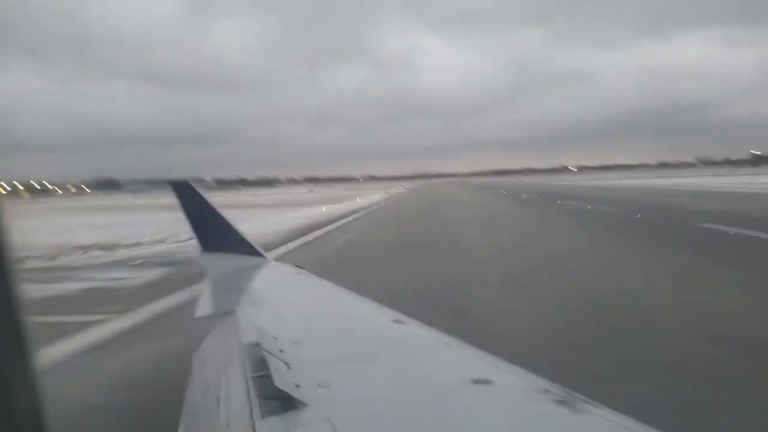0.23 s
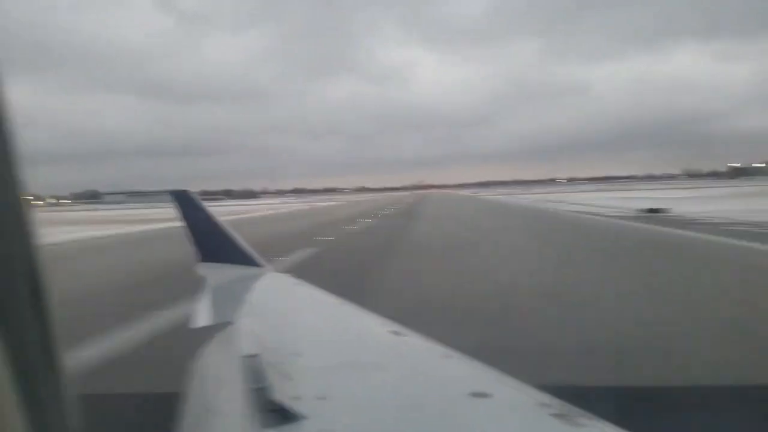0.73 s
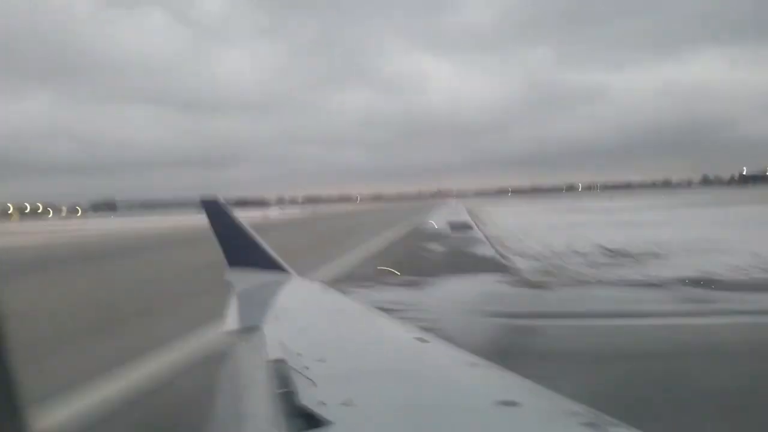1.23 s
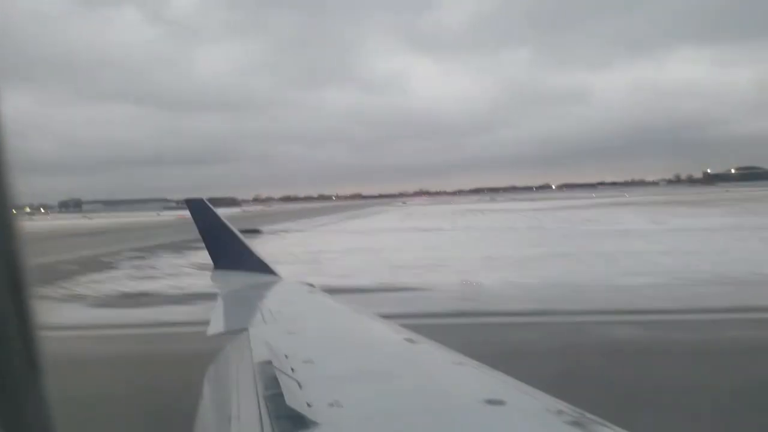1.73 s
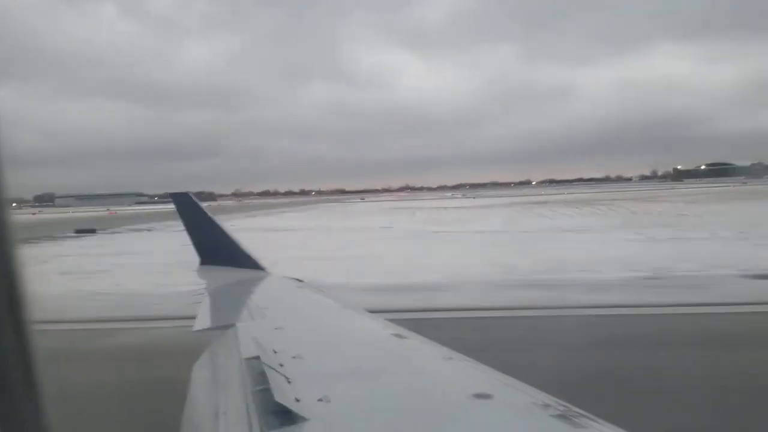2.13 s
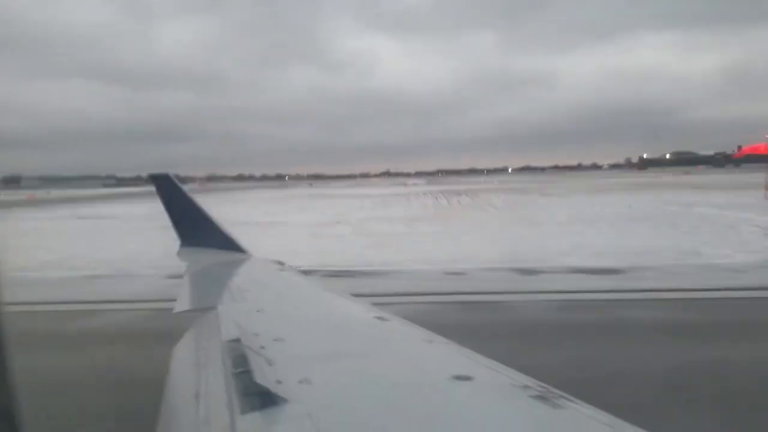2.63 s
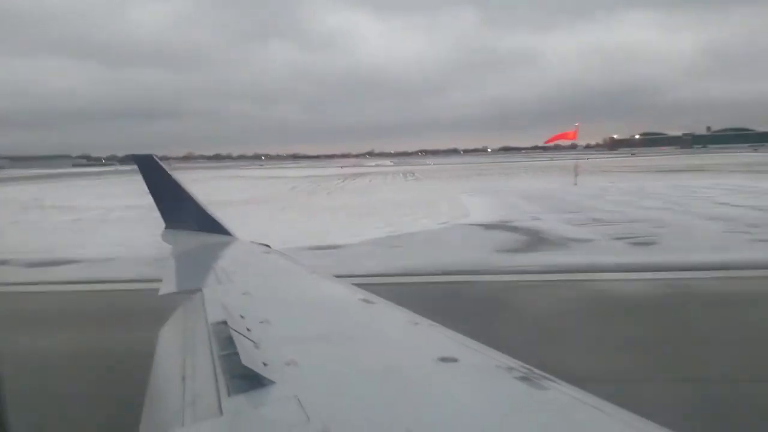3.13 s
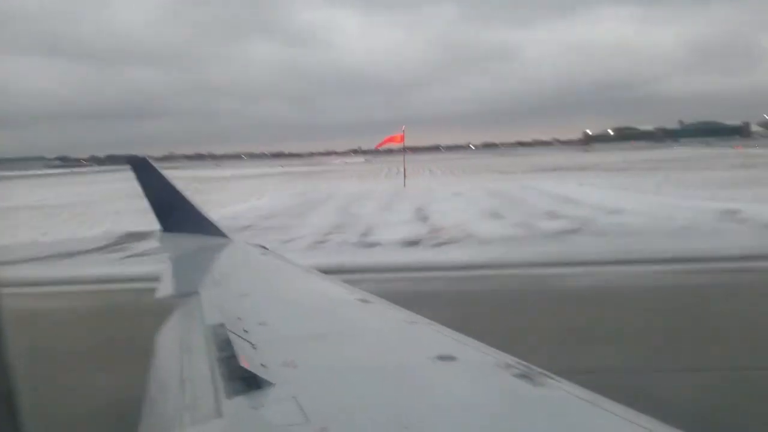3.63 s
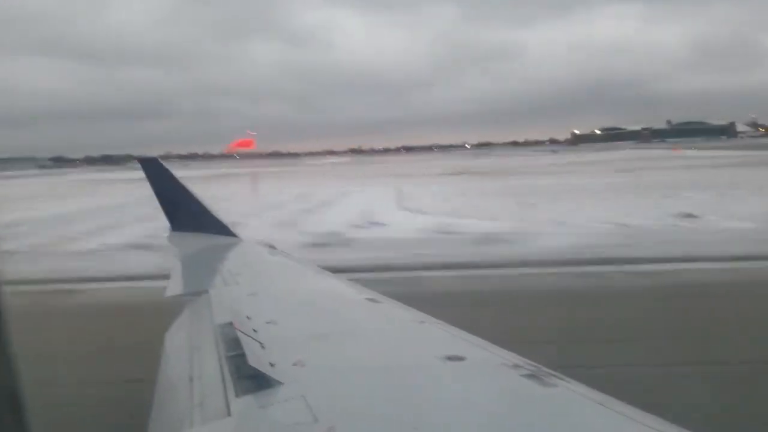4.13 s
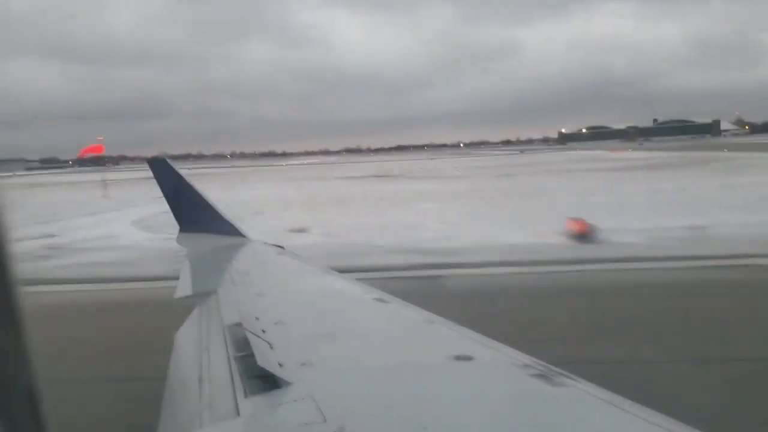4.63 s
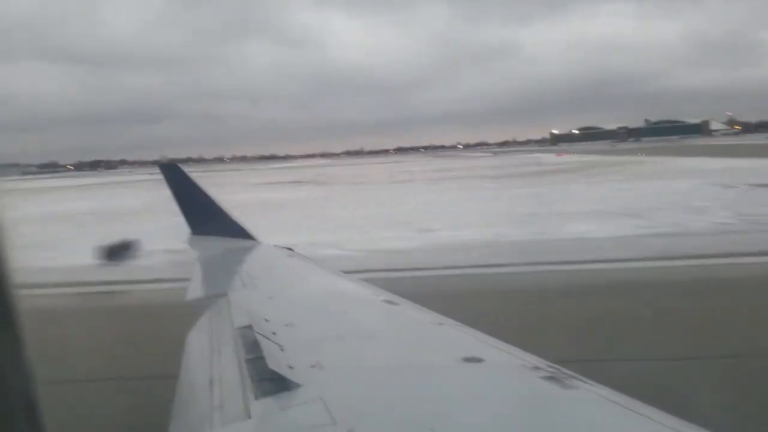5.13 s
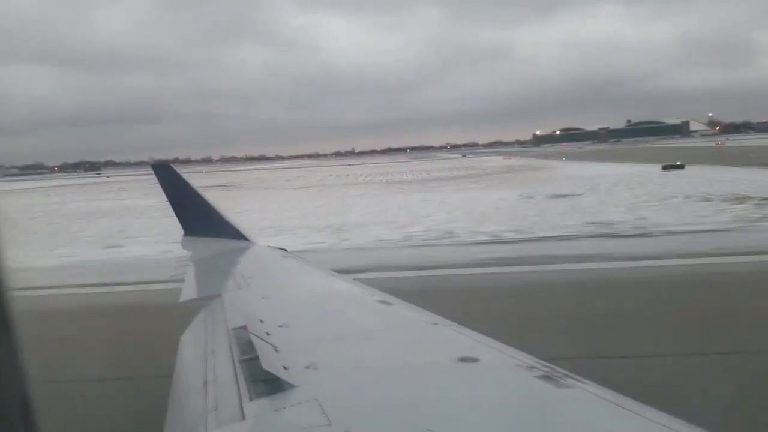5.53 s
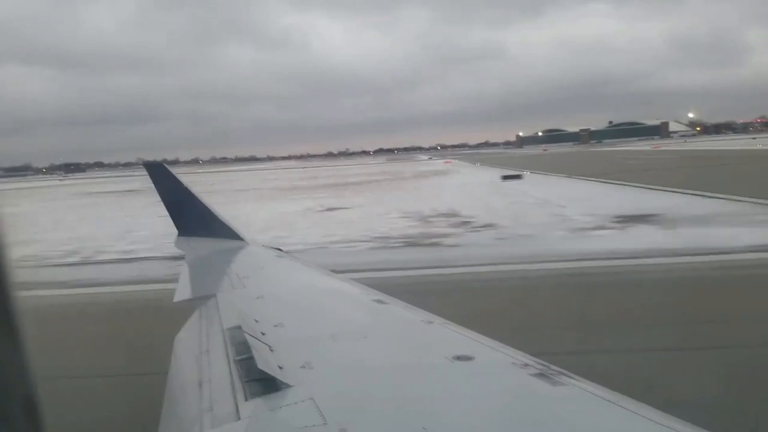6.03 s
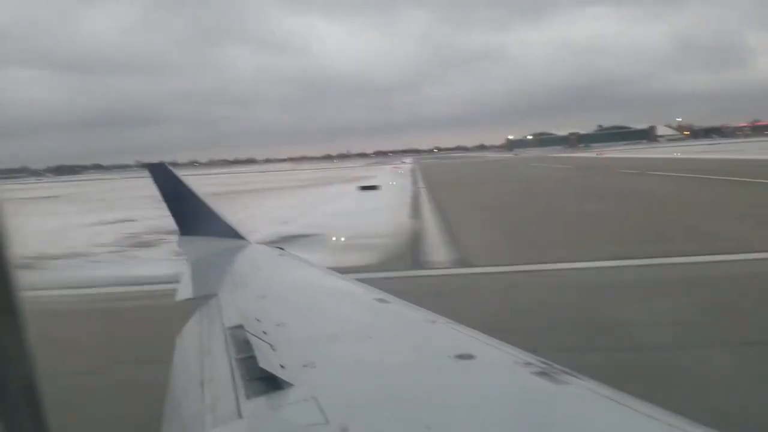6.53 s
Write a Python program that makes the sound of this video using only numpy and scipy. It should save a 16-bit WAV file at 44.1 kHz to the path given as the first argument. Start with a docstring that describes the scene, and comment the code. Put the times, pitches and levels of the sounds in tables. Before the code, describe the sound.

Inside a small jet rolling out after landing: deep rumbling tyre roar, falling drone, wavering engine whine, cabin air hiss, a jolt rattling the trim.

```python
"""Tyre drone in falling tones, swelling through fuselage resonances, at a window seat of a small jet after landing.
The rough runway rumbles, booms and roars as filtered noise; two engines whine as beating pairs of sines.
Two throbbing generators and a brief pump whine over cabin-air noise; trim clicks, knocks, ticks and scuffs.
A jolt rattles the trim; most of the sound sinks for a moment and swells back."""
import sys
import numpy as np
from scipy import signal
from scipy.fft import rfft, irfft, next_fast_len
from scipy.io import wavfile
from scipy.ndimage import uniform_filter1d, minimum_filter1d, map_coordinates

SR = 44100
rng = np.random.default_rng(int(sys.argv[2]) if len(sys.argv) > 2 else 0)


def pcm_store(signal):
    """Save signal as 16-bit PCM."""
    levels = np.round(np.clip(np.atleast_2d(signal), -1, 1) * 32767)
    wavfile.write(sys.argv[1], SR, levels.astype(np.int16).T)


N = 298557


def amp(db):
    """Logarithmic level: decibels to amplitude gain."""
    return 10 ** (np.asarray(db) / 20)


def unit(x):
    """Normalisation: the mean of the channels gets rms 1."""
    return x / np.sqrt(np.mean(np.atleast_2d(x).mean(0) ** 2) + 1e-20)


def along(points, hz):
    """Spectral envelope: (frequency, value) points joined on a logarithmic frequency axis."""
    f, v = np.transpose(points)
    return np.interp(np.log(hz + 1), np.log(f + 1), v)


def curves(rows):
    """Linear interpolation: one value per sample for each column after the time."""
    s, *columns = np.transpose(rows)
    return [np.interp(np.arange(N) / SR, s, column) for column in columns]


def wobble(rate):
    """Slow random modulation: a smooth curve through normal random knots, rate knots a second."""
    knots = rng.standard_normal(int(N * rate / SR) + 4)
    return map_coordinates(knots, [np.arange(N) * rate / SR])


def filtered(x, response):
    """Linear filtering: the spectrum of x times a response of frequency."""
    m = next_fast_len(N + SR // 4)
    return irfft(rfft(x, m) * response(np.fft.rfftfreq(m, 1 / SR)), m)[..., :N]


def pan(lean_db):
    """Interchannel level difference: left and right gains of mean 1."""
    gains = amp(np.array([np.atleast_1d(lean_db), -np.atleast_1d(lean_db)]) / 2)
    return gains / gains.mean(0)


def phase_of(hz):
    """Phase as the integral of frequency, from a random start."""
    return 2 * np.pi * (np.cumsum(hz) / SR + rng.random())


# interchannel correlation of the noise: (f/Hz, correlation)
CORRELATION = [(150, .972), (310, .96), (500, .75), (800, .25), (2000, .1), (5000, 0), (12000, .35)]


def diffuse(response):
    """Diffuse field: stereo noise, alike at both microphones in the bass, largely unrelated in the treble."""
    def mid_side(hz):
        angle = np.arccos(np.clip(along(CORRELATION, hz), -1, 1)) / 2
        return response(hz) * np.array([np.cos(angle), np.sin(angle)])

    mid, side = filtered(rng.standard_normal((2, N)), mid_side)
    return np.array([mid + side, mid - side])


# left-right balance of the noise: (f/Hz, L-R level/dB)
LEAN = [(25, 3), (60, 1.7), (125, .1), (250, -.6), (500, 2.2), (1000, 6), (2000, 9.5), (4600, 13),
        (8000, 5), (12000, 2)]


def rush(spectrum):
    """Shaped broadband noise of rms 1, whose treble comes mostly from the left."""
    noise = diffuse(lambda hz: amp(along(spectrum, hz)))
    return unit(filtered(noise, lambda hz: pan(along(LEAN, hz))))


def steadied(x, seconds, share):
    """Envelope compression: evens out a share of the slow chance swells of a noise."""
    power = np.abs(uniform_filter1d(x.mean(0) ** 2, int(seconds * SR) + 1)) + 1e-9
    return unit(x / power ** (np.clip(share, 0, 1) / 2))


LEFT_LAG_S = 0.00019


def left_late(x):
    """Interchannel time delay: the sound reaches the left microphone LEFT_LAG_S after the right."""
    side = np.array([[-1], [1]])
    return filtered(x, lambda hz: np.exp(np.pi * 1j * hz * LEFT_LAG_S * side))


# the lull after the jolt: a quick fall, a hold and an exponential easing back
LULL_START_S, LULL_FALL_S, LULL_END_S, LULL_RECOVER_S = 1.186, 0.18, 1.77, 0.22


def lull():
    """Envelope of the lull: 0 at full level, 1 at the bottom; a linear fall and an exponential recovery."""
    t = np.arange(N) / SR
    fall = np.clip((t - LULL_START_S) / LULL_FALL_S, 0, 1)
    return fall * np.exp(-np.maximum(t - LULL_END_S, 0) / LULL_RECOVER_S)


def level(rows, sinks_db):
    """Level addition: a curve in dB that sinks during the lull."""
    return curves(rows)[0] - sinks_db * lull()


# reference level of the cabin air, which the generators and ticks also follow: (t/s, level/dB)
AIR_LEVEL = [(0, -37), (.6, -41.5), (1.15, -38), (2.4, -42), (3.1, -38), (4.4, -38.5), (5.6, -38.5),
             (6.77, -36)]
AIR_SINKS_DB = 12.5
# spectrum of the vent hiss: (f/Hz, relative level/dB)
AIR = [(750, -25.5), (1280, -5), (1550, -1.5), (1950, -6), (2250, -5.5), (2850, -7.5), (3500, -11),
       (4250, -10), (4900, -2.5), (6000, -15.5), (8700, -29.5), (10200, -25.5), (14300, -33.5),
       (15600, -43.5)]
# spectrum of the airflow along the skin: (f/Hz, relative level/dB)
WIND = [(500, -41), (750, -1), (915, 4), (1000, -7.5), (1130, -1.5), (1300, -11.5), (1700, -40.5),
        (4000, -86)]
# narrow bands of cabin noise that rise and fall with the air:
# (f/Hz, width at half amplitude/Hz, level relative to the air reference/dB, L-R level/dB)
CABIN_BANDS = [(214, 12, 9, 0), (386.2, 18, 0.5, -9), (483.3, 30, 4.5, -5.5), (1191, 21, -5.5, 8),
               (1410, 46, -14, 6), (1825, 140, -11, 24.5), (2716, 56, -17, 14.5), (3138, 110, -16.5, 5)]
WALL_S = .00377  # delay of the wall reflection


def cabin():
    """Broadband and narrow-band noise: vent hiss, airflow along the skin and narrow bands that follow the air."""
    air_db = level(AIR_LEVEL, AIR_SINKS_DB)
    # interference with the wall reflection ripples the spectrum of the hiss
    hiss = unit(filtered(rush(AIR), lambda hz: 1 + 0.15 * np.exp(-2j * np.pi * hz * WALL_S)))
    out = amp(-0.55 + 0.92 * wobble(30)) * hiss
    out += amp(0.5 + 2.0 * wobble(8.8)) * rush(WIND)
    for centre, width, db, lean_db in CABIN_BANDS:
        band = unit(diffuse(lambda hz: 1 / (1 + ((hz - centre) / width * 2) ** 2)))
        out += amp(db) * band * pan(lean_db)
    return amp(air_db + 0.085 * wobble(7.7)) * out


# a small pump runs up and down: (t/s, f/Hz, rms level/dB)
PUMP = [(2.1, 1453, -64), (2.25, 1433, -49.5), (2.5, 1480, -51), (2.75, 1483, -53), (3.0, 1430, -44),
        (3.2, 1374, -75)]
# third and sixth harmonic of the on-board power:
# (f/Hz, level relative to the air reference/dB, L-R level/dB, left phase lead/rad)
ELECTRIC = [(1196.5, -.5, 6.5, 2.1), (2393, -20, 12, -1.7)]
# how far the second generator runs flat at the third harmonic: (t/s, difference f/Hz)
THROB = [(0, 5.25), (2.8, 5.25), (3.3, 3.3), (4.1, 3.5), (4.8, 4.3), (6.77, 4.2)]
SECOND_GENERATOR_DB = -8  # relative to the first


def systems():
    """Beating of close frequencies: two generators throb, and a pump whines briefly as a gliding sine."""
    air_db = level(AIR_LEVEL, AIR_SINKS_DB)
    pump_hz, pump_db = curves(PUMP)
    out = amp(pump_db) * np.sin(phase_of(pump_hz)) * pan(5)
    # the throb is a little out of step at the two microphones
    slip = 2 * np.pi * np.cumsum(curves(THROB)[0]) / SR + np.array([[-1.7], [-.3]])
    for hz, db, lean_db, lead in ELECTRIC:
        turn = phase_of(np.full(N, hz)) + .12 * wobble(9) + np.array([[lead], [0]])
        second = np.sin(turn - slip * hz / ELECTRIC[0][0])
        pair = np.sin(turn) - amp(SECOND_GENERATOR_DB) * second
        out = out + amp(air_db + db + .8 * wobble(14)) * pair * pan(lean_db)
    return np.sqrt(2) * out  # a sine of rms 1 peaks at root 2


# spectrum of clicks and ticks of the trim: (f/Hz, gain/dB)
CLICK = [(250, -8), (1200, -1), (2400, 1), (3600, -2), (5200, 2), (7000, -7), (9000, -13), (13000, -16.5),
         (16000, -28)]


def chatter():
    """Random impulse process: shaken fittings tick as decaying noise, about 12 times a second."""
    t = np.arange(SR // 20) / SR
    tap_db = level(AIR_LEVEL, AIR_SINKS_DB) + 8.0 + 1.2 * rng.standard_normal(N)
    taps = (rng.random(N) < 12 / SR) * amp(tap_db)
    tick = amp(-60 * t / 0.018) * rng.standard_normal((2, len(t)))
    ticks = signal.fftconvolve(taps[None], tick, axes=1)[:, :N]
    return filtered(ticks, lambda hz: amp(along(CLICK, hz))) * pan(3.1)


# loose trim: (t/s, click level before colouring/dB, decay time t60/s, L-R level/dB,
# knock offset from the click/dB, pitch of the loose part f/Hz, gain of its ring/dB)
RATTLE = [(.0675, -29, .008, 6, -20, 5200, 0), (.072, -19, .035, 11, -3, 2000, 2),
          (.142, -23.5, .02, 10, -20, 5600, 0), (.157, -25, .02, 10, -20, 5000, 1),
          (1.111, -31, .02, 8, -20, 5600, 3), (1.2019, -9, .004, -5, 4, 2400, 6),
          (1.209, -28, .012, 4, -12, 9500, 3), (1.213, -17.5, .025, 8, -3, 5200, 2),
          (1.2178, -25, .01, 0, 7, 1900, 9), (1.227, -30, .025, 8, -20, 5400, 5),
          (1.256, -34, .04, 6, -6, 11500, 2), (1.269, -31, .03, 6, -4, 5200, 2),
          (1.281, -32, .008, 6, -20, 9500, 0), (2.045, -34, .02, 13, -8, 3800, 4),
          (2.134, -36, .04, 4, 10, 4600, 2), (2.945, -35, .04, 3, -20, 6800, 3),
          (3.183, -33, .05, 12, 3, 2100, 13), (3.362, -29, .025, 12, -10, 4900, 6),
          (3.642, -33, .02, 12, -10, 4900, 6), (4.562, -31, .02, 10, -15, 6600, 5),
          (4.8, -33, .025, 12, -5, 2400, 11), (5.247, -33, .02, 13, -8, 2600, 11)]
# modes of the knocked panel: (f/Hz, relative level/dB, decay time t60/s)
PANEL = [(380, -1, .06), (500, 0, .05), (720, -10, .03), (1150, 0, .025), (1700, -2, .018),
         (2420, -3, .012)]
# spectrum of the dull, noisy part of a knock: (f/Hz, gain/dB)
THUD = [(150, -6), (450, 9), (900, 1.5), (1600, -6.5), (2400, -13), (3600, -32)]
# brief scuffs: (t/s, level/dB, hold/s)
SCUFF = [(6.05, -34.5, .014), (6.066, -37, 0.024)]
PART_Q = 3.5  # loose plastic parts ring only for a few cycles
THUD_DB, THUD_T60_S = 3, 0.021
SCUFF_RISE_S, SCUFF_T60_S = .005, 0.04


def scuffs():
    """Friction noise: short strokes whose rapid random modulation makes them grainy."""
    now = np.arange(N) / SR
    strokes = np.zeros(N)
    for s, db, hold in SCUFF:
        rise = np.clip((now - s) / SCUFF_RISE_S, 0, 1)
        strokes += rise * amp(db - 60 * np.maximum(now - s - hold, 0) / SCUFF_T60_S)
    spectrum = [(1200, -18), (2200, -1.0), (3200, 3.5), (5400, 1.5), (6500, -17.5), (8200, -22), (14000, -32)]
    return strokes * amp(2 * wobble(300)) * rush(spectrum)


def rattles():
    """Impact and modal decay: loose trim clicks at its own pitches and knocks its panel; scuffs are added."""
    t = np.arange(SR // 4) / SR
    clicks, knocks, thuds = np.zeros((3, 2, N + SR))
    for s, db, t60, lean_db, knock_db, part_hz, part_db in RATTLE:
        start = round(s * SR)
        span = slice(start, start + len(t))
        burst = amp(db - 60 * t / t60) * rng.standard_normal((2, len(t))) * pan(lean_db)
        part = signal.lfilter(*signal.iirpeak(part_hz, PART_Q, SR), burst)
        clicks[:, span] += burst + amp(part_db) * part
        ring = np.zeros(len(t))
        for hz, mode_db, life in PANEL:
            # each impact excites the modes in a different balance
            ring += amp(mode_db + rng.normal(0, 3.6) - 60 * t / life) * np.sin(2 * np.pi * hz * t)
        knocks[:, span] += amp(db + knock_db - 17.0) * ring * pan(lean_db)
        thud_gain = amp(db + knock_db + THUD_DB - 60 * t / THUD_T60_S)
        thuds[:, span] += thud_gain * rng.standard_normal(len(t)) * pan(lean_db)
    clicks = filtered(clicks[:, :N], lambda hz: amp(along(CLICK, hz)))
    thuds = filtered(thuds[:, :N], lambda hz: amp(along(THUD, hz)))
    return clicks + thuds + knocks[:, :N] + scuffs()


# unevenness of the pavement, which shakes the floor and the tyres: (t/s, relative level/dB)
ROAD = [(0, 1.5), (.3, -2), (.55, -5), (.85, -4), (1.08, 3.5), (1.27, 1.5), (1.45, 3.5), (2.1, 0),
        (2.5, -3.5), (2.8, -0.5), (3.18, 3), (3.4, -2.5), (4, 1), (4.7, -2), (5.5, -1), (6.77, -3.5)]
# bumps in the pavement: (t/s, extra rumble level/dB)
BUMPS = [(0.108, 5.5), (1.14, 1.5), (2.3, 4.5), (4.0, 5), (4.42, 4), (6.43, 4.5)]
# level of the fuselage boom: (t/s, level/dB)
BOOM_LEVEL = [(0, -14), (.65, -19.5), (1.1, -15), (2.7, -17), (3.4, -19.5), (4.4, -22.5), (5.3, -18.5),
              (6.77, -21)]
# level of the tyre roar: (t/s, level/dB)
ROAR_LEVEL = [(0, -26), (.85, -26), (1.08, -23), (1.24, -22), (1.4, -22), (1.8, -23), (2.15, -20),
              (2.5, -21.5), (3.15, -21), (4.3, -23.5), (4.43, -20.5), (4.6, -24), (5.45, -25.5), (6, -24),
              (6.77, -26)]
# spectrum of the rumble: (f/Hz, relative level/dB)
RUMBLE = [(15, -15), (30, -15), (45, -7.5), (55, -9), (66, 4), (85, -5), (105, 1), (128, -3.5), (160, -11),
          (260, -27.5), (600, -98)]
# spectrum of the boom: (f/Hz, relative level/dB)
BOOM = [(60, -51), (120, -5.5), (155, -4), (175, -5), (205, -3), (245, -10.5), (290, -36.5), (420, -43.5),
        (900, -94)]
# spectrum of the roar: (f/Hz, relative level/dB)
ROAR = [(150, -31), (250, 1), (312, -2), (350, -3.5), (426, -3.5), (487, -6), (521, -2.5), (760, -20.5),
        (847, -26.5), (860, -13), (1120, -23.5), (1890, -120)]
RUMBLE_DB = -15  # before the unevenness and bumps
BUMP_S = 0.07  # half-width of a bump at 1/e of its extra dB
RUMBLE_SINKS_DB, BOOM_SINKS_DB, ROAR_SINKS_DB = 16.5, 11, 14


def runway():
    """Random excitation: rough pavement shakes the floor, booms in the fuselage and roars at the tyres."""
    t = np.arange(N) / SR
    bumps_db = sum(db * np.exp(-((t - s) / BUMP_S) ** 2) for s, db in BUMPS)
    rumble_db = RUMBLE_DB + level(ROAD, RUMBLE_SINKS_DB) + bumps_db
    rumble = amp(rumble_db) * steadied(rush(RUMBLE), seconds=0.11, share=0.62)
    boom_db = level(BOOM_LEVEL, BOOM_SINKS_DB)
    boom = amp(boom_db) * steadied(rush(BOOM), seconds=0.15, share=0.78)
    roar = amp(level(ROAR_LEVEL, ROAR_SINKS_DB)) * rush(ROAR)
    return left_late(rumble + boom) + roar


# engine whine: (t/s, f/Hz)
SPOOL = [(0, 908), (.7, 899), (2, 897.5), (3.1, 898.5), (3.5, 903.5), (5.3, 904.3), (5.9, 905.8),
         (6.4, 903.7), (6.77, 904)]
# level of the engine whine: (t/s, level/dB)
WHINE = [(0, -44), (.25, -33), (.7, -39.5), (1.15, -41), (2.1, -41), (2.55, -41.5), (2.9, -36), (3.25, -38),
         (3.55, -32.5), (3.95, -35), (4.15, -32.5), (5.2, -34), (6, -31), (6.77, -31.5)]
# moments at which the two engines cancel most: (t/s)
BEATS = [0, .45, .82, 1.08, 1.36, 1.66, 1.92, 2.15, 2.42, 2.72, 3.08, 3.33, 3.86, 4.02, 4.58, 5.3, 5.69,
         6.1, 6.85]
WHINE_SINKS_DB = 10.5
SECOND_ENGINE_DB = -6.5  # relative to the first
LOCK = 0.59  # the engines linger in step and slip quickly through each cancellation (0-1)


def engines():
    """Beating: the second compressor tone runs a little faster; both flutter on their way through the cabin."""
    turn = phase_of(curves(SPOOL)[0]) + 0.24 * wobble(6.1)
    beat = 2 * np.pi * np.interp(np.arange(N) / SR, BEATS, np.arange(len(BEATS)))
    lead = beat + np.clip(LOCK, 0, 1) * np.sin(beat)

    def flutter():
        gain = amp(1.2 * wobble(22))
        phase = turn + .24 * wobble(18)
        return gain * (np.sin(phase) - amp(SECOND_ENGINE_DB) * np.sin(phase + lead))

    tone = np.array([flutter(), flutter()]) * pan(5.8)
    # a faint octave above
    octave = amp(-24.0 + 3.1 * wobble(4.7)) * np.sin(2 * turn + 0.46 * wobble(22)) * pan(12)
    return np.sqrt(2) * amp(level(WHINE, WHINE_SINKS_DB)) * (tone + octave)


# fuselage resonances that the tyre orders sweep through: (f/Hz, width at half amplitude/Hz, peak gain/dB)
FUSELAGE = [(100.4, 5.8, -23), (110.4, 4.5, -12), (114.8, 4, -16.5), (118.7, 4, -17.5), (124.8, 3.5, -15),
            (141.3, 8.5, -11), (151, 8.5, -16.5), (177.5, 9, -21), (190, 12, -15), (215.4, 11.9, -12.5),
            (264, 9, -19), (315, 28, -28), (388, 35, -31), (485, 16, -15)]
OFF_RESONANCE_DB = -30.5  # what gets through between them


def fuselage(hz):
    """Resonant transmission: gain with which a tyre tone reaches the cabin, summed as power."""
    peaks = sum(amp(db) ** 2 / (1 + (2 * (hz - centre) / width) ** 2) ** 2
                for centre, width, db in FUSELAGE)
    return np.sqrt(amp(OFF_RESONANCE_DB) ** 2 + peaks)


# wheel speed: (t/s, rotation f/Hz)
WHEEL = [(0, 31.69), (1, 29.91), (2.3, 27.25), (3.3, 25.59), (5, 23.65), (6.77, 22.27)]
# tyre orders: (multiple of the wheel speed, relative level/dB)
TYRE = [(3, -2.5), (4, 1), (5, -14.5), (6, 2.5), (7, -.5), (8, 0), (9, -8.5), (10, -3.5), (12, -6),
        (13, -4.5), (16, -11.5), (19, -14.5), (20, -11), (21, -15), (22, -14.5)]
DRONE_SINKS_DB = 6


def tyres():
    """Order excitation: out-of-round tyres shake the gear at multiples of wheel speed, swelling at resonances."""
    speed = curves(WHEEL)[0]
    turn = phase_of(speed)
    drone = np.zeros(N)
    for multiple, db in TYRE:
        order = round(multiple)
        # the changing load on the wheel makes every order waver
        waver = amp(2.4 * wobble(15) - .35)
        phase = order * turn + 2 * np.pi * rng.random() + .2 * wobble(9)
        drone += amp(db) * fuselage(order * speed) * waver * np.sin(phase)
    return left_late(amp(level(ROAD, DRONE_SINKS_DB)) * drone)


def scene():
    """Superposition: everything heard at the window seat."""
    return runway() + tyres() + engines() + systems() + cabin() + rattles() + chatter()


TOP_HZ = 15700  # band limit


def record(dry):
    """Peak limiting and band limiting: gain dips hold peaks near the ceiling; nothing stays above TOP_HZ."""
    ceiling = .95
    needed = np.minimum(1, ceiling / (np.abs(dry).max(0) + 1e-9))
    gain = uniform_filter1d(minimum_filter1d(needed, size=900), size=600)
    return filtered(dry * gain, lambda hz: hz < TOP_HZ)


dry = scene()
out = record(dry)
pcm_store(out)
```